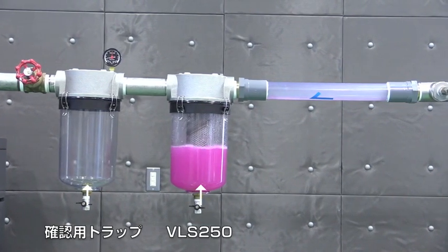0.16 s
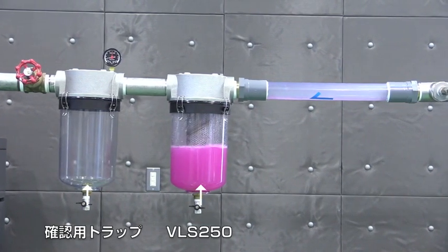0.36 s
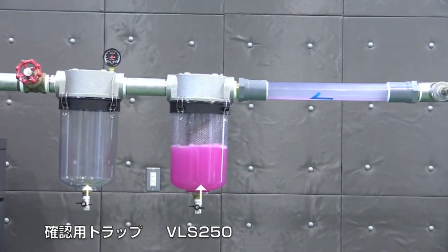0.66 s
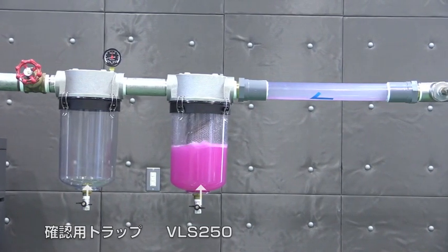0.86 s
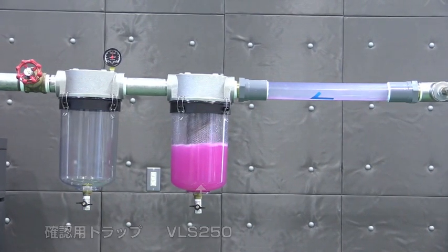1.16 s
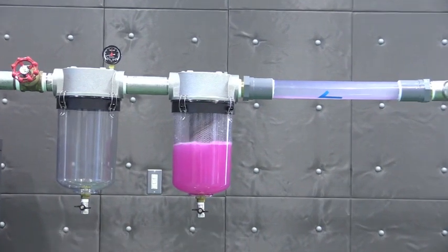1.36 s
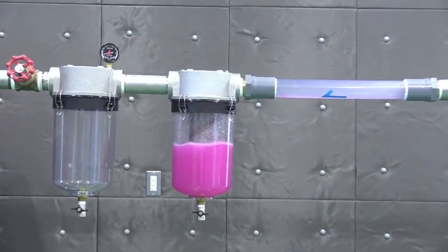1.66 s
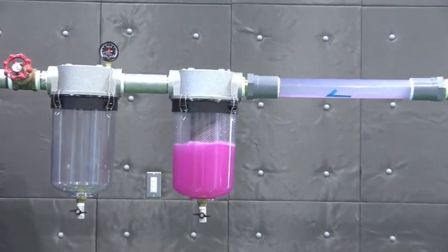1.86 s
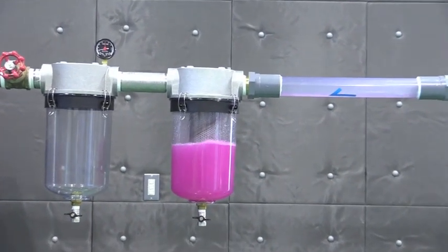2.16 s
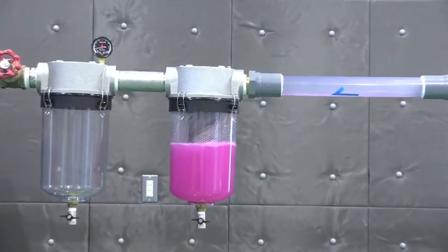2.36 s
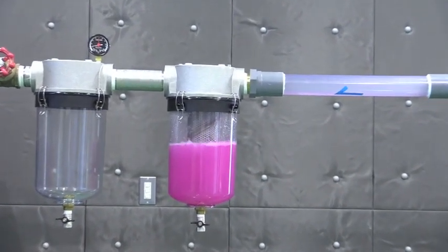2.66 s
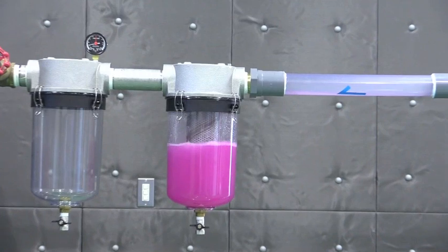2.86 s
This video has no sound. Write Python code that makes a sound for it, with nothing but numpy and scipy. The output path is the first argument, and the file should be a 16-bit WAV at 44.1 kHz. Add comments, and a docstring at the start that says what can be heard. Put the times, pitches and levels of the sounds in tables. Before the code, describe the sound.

A vacuum pump hums low and steady with rushing air, dipping to silence once briefly

```python
"""Vane pump in a padded room

A vane vacuum pump runs steadily in a padded test room, heard by a stereo microphone some metres away.
Four vanes a turn give a drifting hum, built from sines at multiples of the vane rate.
Motor and casing sing thin wavering sines, and one motor whine swells and sinks.
Air rushes in the pipes: shaped stereo noise. An edit fades the sound out and straight back in."""
import sys
import numpy as np
from scipy import signal
from scipy.fft import rfft, irfft
from scipy.io import wavfile
from scipy.ndimage import uniform_filter1d

SR = 44100
rng = np.random.default_rng(int(sys.argv[2]) if len(sys.argv) > 2 else 0)


def file_out(sig):
    """Save sig as 16-bit WAV at sys.argv[1]."""
    # one column per channel
    cols = np.atleast_2d(sig).T
    # limit, then scale
    lim = np.clip(cols, -1, 1)
    pcm = np.round(lim * 32767).astype(np.int16)
    wavfile.write(sys.argv[1], SR, pcm)


def elevation(decibels):
    """Turn decibel levels (scalar or array-like) into linear amplitude ratios."""
    levels = np.asarray(decibels, float)
    return 10 ** (levels / 20)


N = 133182  # samples


def evened(x):
    """Scales to rms 1."""
    return x / np.sqrt(np.mean(np.abs(x) ** 2) + 1e-20)


def read(points, hz):
    """Reads a table on a log-frequency axis."""
    f, value = np.transpose(points)
    return np.interp(np.log(hz + 1), np.log(f + 1), value)


def drift(rate_hz):
    """Slow complex chance of rms 1: noise low-passed at about rate_hz."""
    points, hop = 2048, 128  # one point every 128 samples
    hz = np.fft.fftfreq(points, hop / SR)
    noise = rng.standard_normal(points) + 1j * rng.standard_normal(points)
    slow = np.fft.ifft(noise / (1 + (hz / rate_hz) ** 2))
    return evened(np.interp(np.arange(N) / hop, np.arange(points), slow))


def tone(hz, db, pan_db, lead, waver=0, start=None):
    """A sine in both channels; waver is a complex wobble of strength and phase."""
    side = np.array([[0.5], [-0.5]])  # left, right
    if start is None:
        start = 2 * np.pi * rng.random()
    phase = 2 * np.pi * hz * np.arange(N) / SR + start + side * lead
    turn = np.exp(1j * phase)
    level = np.sqrt(2) * elevation(db + side * pan_db)  # db is an rms level
    return level * (turn * evened(1 + waver)).real


# The first three hum partials at the microphone as the load drifts, with a jump at the edit:
# t/s, first level/dB rms, second level/dB rms, third level/dB rms
HUM_LOAD = [(0, -27.5, -19, -39), (.12, -23, -15.5, -33), (.3, -27, -16.5, -30), (.6, -27, -16.5, -27),
            (1.0, -33.5, -17, -27), (1.15, -34.5, -20, -26), (1.32, -39, -19, -26.5),
            (1.335, -33, -40, -35), (1.5, -33, -37, -41), (1.6, -31, -30, -33), (1.8, -27, -23.5, -28.5),
            (2.0, -26, -20.5, -27), (2.2, -25.5, -19, -24.5), (2.3, -24, -17, -26),
            (2.6, -24, -16.5, -26.5), (3.02, -24.5, -15, -27)]
# Where those partials sit in the stereo picture: left-right level/dB, left lead/radians
HUM_PLACES = [(1.3, 0.22), (2, .04), (3.4, .13)]
# Which higher partials are heard: multiple of the vane rate
HUM_OVERTONES = [4, 6, 7, 10]
# Those higher partials in the same order: level/dB rms, left-right level/dB, left lead/radians
HUM_OVERTONE_LEVELS = [(-35.5, 2, 0.024), (-44.5, 1.5, -0.11), (-48.5, 8, 0.55), (-57.5, 0, .1)]


def hum():
    """Vane pulses, four a turn, heard as harmonic partials; the lowest three follow the load."""
    vane_hz = 4 * 29.228  # vanes times turns per second
    third_lag = 2.8  # radians; keeps the hum from throbbing
    waver_depth, waver_hz = 0.22, 1.5  # depth as a share of the steady tone

    t = np.arange(N) / SR
    times, *levels = np.transpose(HUM_LOAD)
    starts = [0, 0, -third_lag]
    out = 0
    for k, (level, place, start) in enumerate(zip(levels, HUM_PLACES, starts), 1):
        out = out + tone(k * vane_hz, np.interp(t, times, level), *place, start=start)
    for k, (db, pan_db, lead) in zip(HUM_OVERTONES, HUM_OVERTONE_LEVELS):
        out = out + tone(k * vane_hz, db, pan_db, lead, waver_depth * drift(waver_hz))
    return out


# Thin tones of motor and casing at the microphone: f/Hz, level/dB rms
SINGING_TONES = [(1351, -55), (2396.4, -52), (2571.3, -53), (2688.7, -52), (2922.4, -56), (3040, -52),
                 (3098.4, -55.5), (3215.6, -50), (3503, -55), (3623, -58), (3736, -56), (4420, -63),
                 (4797, -63), (4845, -59), (5044, -63), (5238, -65), (5681, -63), (6078, -65), (6422, -64),
                 (6589, -68), (7036, -70), (7634, -68), (7935, -66), (8543, -69), (8576, -64), (8705, -68),
                 (9044, -66), (9168, -64), (9825, -73), (10287, -73), (10438, -70), (10756, -72),
                 (11133, -72), (11423, -73), (11553, -72), (11876, -74), (12069, -74), (12247, -76),
                 (13227, -77), (13733, -78)]


def singing():
    """Thin unsteady tones, each from its own direction; the higher, the faster they waver and the fuzzier."""
    waver_depth, waver_share = 0.41, 0.0012  # depth as a share of the tone, rate as a share of pitch
    pan_db, lead_rad = 1.5, 0.43  # typical spread between left and right
    ways = rng.standard_normal((len(SINGING_TONES), 2))
    out = 0
    for (hz, db), (pan, lead) in zip(SINGING_TONES, ways):
        waver = waver_depth * drift(waver_share * hz)
        out = out + tone(hz, db, pan_db * pan, lead_rad * lead, waver)
    return out


# Colour of the air noise before its overall level is set: f/Hz, relative level/dB per Hz
RUSH_COLOUR = [(25, -39), (45, -38), (55, -24), (66, -23.5), (74, -11), (100, -13), (140, -2), (200, -0.5),
               (275, -2.26), (380, -6), (420, -11.5), (470, -10), (550, -13), (690, -12.5), (745, -17),
               (830, -15), (1150, -18.5), (1550, -23), (2000, -19.5), (3350, -25.5), (4100, -30.5),
               (5500, -34.5), (7300, -37.5), (8300, -39.5), (10000, -40), (12500, -46), (14500, -49),
               (15100, -56), (15700, -62)]
# Pipe and casing resonances lifting or hollowing the rush: f/Hz, full width at half lift/Hz, lift level/dB
RUSH_HUMPS = [(78, 17, 4), (233, 21, -2), (265.5, 34, 4), (375, 33, 3), (662, 66, 5), (740, 47, -8),
              (3370, 100, -5), (5700, 200, 0), (2230, 360, 2), (2398, 63, 5.5), (2568, 122, 7),
              (2754, 126, 4), (3140, 250, 1.5), (3760, 260, 5.5), (4480, 310, 3.5), (4910, 270, 5.5),
              (6400, 270, 0.5), (7910, 170, 6.5), (8660, 200, 4), (9160, 390, 5.5), (10930, 200, 2),
              (11600, 500, 3), (14200, 500, 3)]
# How alike the rush is in left and right: f/Hz, likeness (1 = same)
RUSH_LIKENESS = [(60, 1), (110, 0.95), (200, 0.99), (380, 1), (700, 0.8), (1290, 0.37), (2380, 0.87),
                 (4400, 0.5), (8120, 0.49), (15000, 0.59)]
# How the rush leans in the stereo picture: f/Hz, left-right level/dB
RUSH_BALANCE = [(60, 4), (110, 1.5), (200, 0), (380, 3.5), (700, -1), (1290, 3), (2380, 1.4), (4400, 0.9),
                (8120, -1.2), (15000, -1.5)]
# Phase of the rush between left and right: f/Hz, left lead/radians
RUSH_LEADS = [(0, -0.45), (950, 0.67), (1890, -0.61), (3190, 1), (4820, -1.5), (6120, 0.4), (7240, -0.47),
              (7920, -0.12), (9650, -0.36), (9910, -0.49), (11500, -0.04), (12100, -0.8), (12800, -0.2),
              (15200, -0.0)]
# Steady comb of small resonances and echoes: f/Hz, rms depth level/dB
RUSH_RIPPLE = [(1000, 1.0), (4000, 2), (6000, 3), (14000, 3.5)]


def rush():
    """Air noise through pipe resonances, with drifting patches, a slow swell and a quick flicker."""
    level_db, patch_db, swell_db, flicker_db = -21, 0.2, 0.3, 0.02  # last three: rms depths
    size, hop = 2048, 512  # samples

    hz = np.fft.rfftfreq(size, 1 / SR)
    a, b, c, d, patches = rng.standard_normal((N // hop + 5, len(hz), 5)).T
    patches = uniform_filter1d(patches, size=20, axis=0)  # over frequency
    patches = evened(uniform_filter1d(patches, size=7, axis=1))  # over time

    colour = read(RUSH_COLOUR, hz)
    for f, width, lift in RUSH_HUMPS:
        colour = colour + lift / (1 + (2 * (hz - f) / width) ** 4)

    # the right channel shares part of the left one's noise
    same = read(RUSH_LIKENESS, hz)[:, None]
    left = a + 1j * b
    right = same * left + np.sqrt(1 - same ** 2) * (c + 1j * d)
    right = right * np.exp(-1j * read(RUSH_LEADS, hz))[:, None]
    half = elevation(read(RUSH_BALANCE, hz) / 2)[:, None]
    spectra = np.array([left * half, right / half])
    spectra = spectra * elevation(colour[:, None] + patch_db * patches)
    air = evened(signal.istft(spectra, nperseg=size, noverlap=size - hop)[1][:, :N])

    # the comb is fixed in time and common to both channels
    fine = np.fft.rfftfreq(N, 1 / SR)
    comb = uniform_filter1d(rng.standard_normal(len(fine)), size=30)
    comb = evened(uniform_filter1d(comb, size=30))
    air = evened(irfft(rfft(air) * elevation(read(RUSH_RIPPLE, fine) * comb), N))

    swell = swell_db * evened(drift(0.75).real)
    flicker = flicker_db * evened(drift(25.0).real)
    return air * elevation(level_db + swell + flicker)


# Swells of the motor whine at the microphone: middle t/s, full length at 1/e t/s, peak level/dB rms
WHINE_SWELLS = [(.2, 0.32, -42.5), (.6, .1, -52), (0.96, 0.44, -40.5), (1.7, .15, -49), (1.95, .15, -41),
                (2.14, 0.29, -34), (2.9, 0.36, -37.5)]


def whine():
    """One thin motor tone, a little to the right, that swells and sinks."""
    t = np.arange(N) / SR
    swells = 0
    for middle, length, db in WHINE_SWELLS:
        swells = swells + elevation(db) * np.exp(-(2 * (t - middle) / length) ** 4)
    return tone(2309.8, 0, pan_db=-4, lead=0.21) * swells


def scene():
    """Pump hum, singing metal, rushing air and motor whine."""
    return hum() + singing() + rush() + whine()


def low_pass(x):
    """Removes everything above the highest recorded frequency."""
    return signal.sosfilt(signal.butter(12, 15600, fs=SR, output="sos"), x)


def record(dry):
    """Straight fades down to the edit and up again."""
    edit_s, fade_out_s, fade_in_s, floor_db = 1.3283, 0.1, 0.1, -60
    t = np.arange(N) / SR - edit_s
    fade = np.maximum(-t / fade_out_s, t / fade_in_s)
    fade = np.clip(fade, elevation(floor_db), 1)
    return low_pass(dry * fade)


dry = scene()
out = record(dry)
file_out(out)
```